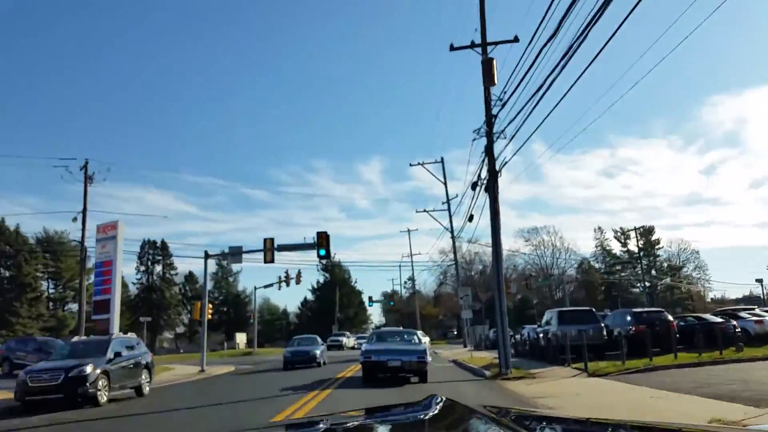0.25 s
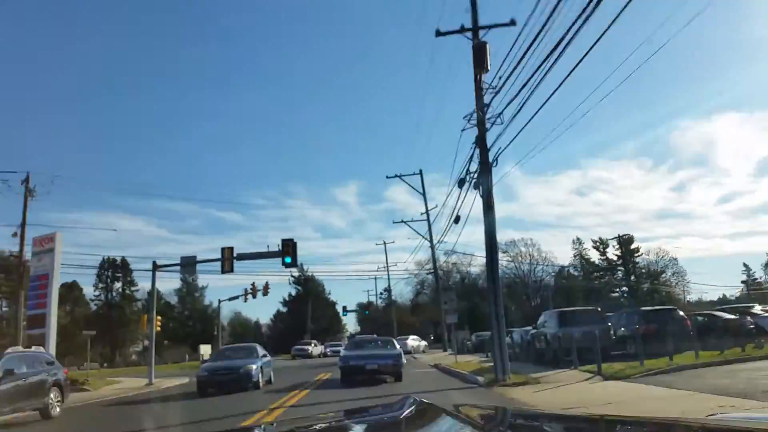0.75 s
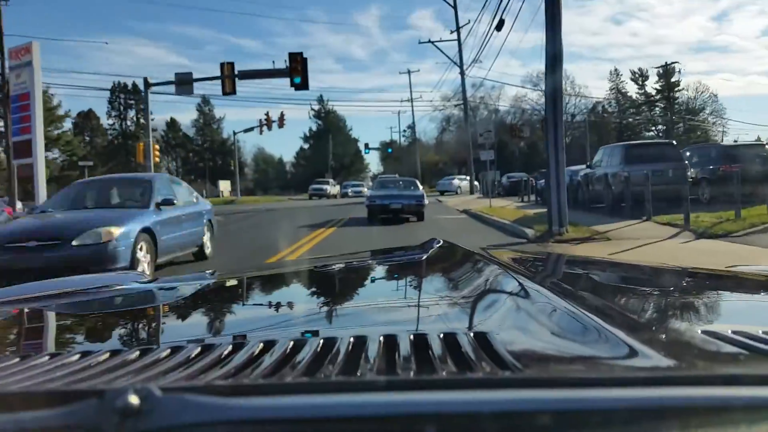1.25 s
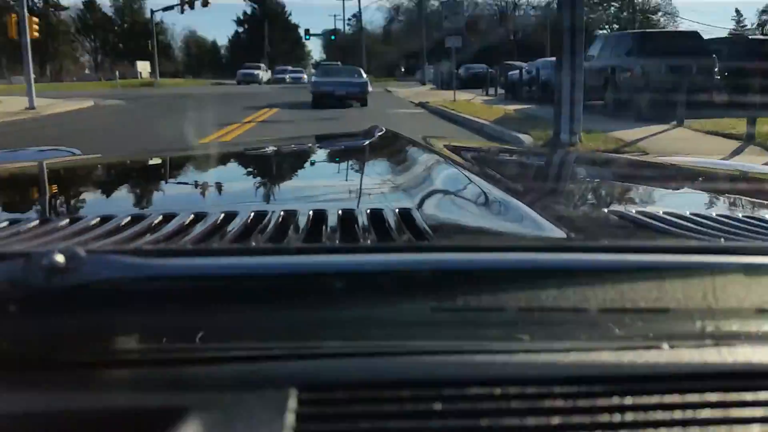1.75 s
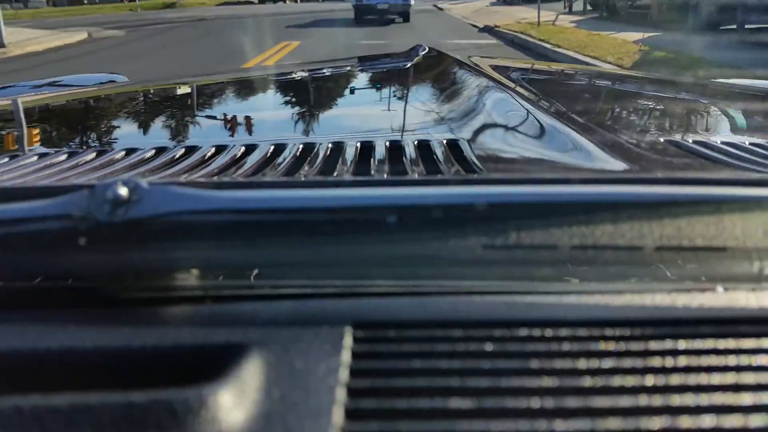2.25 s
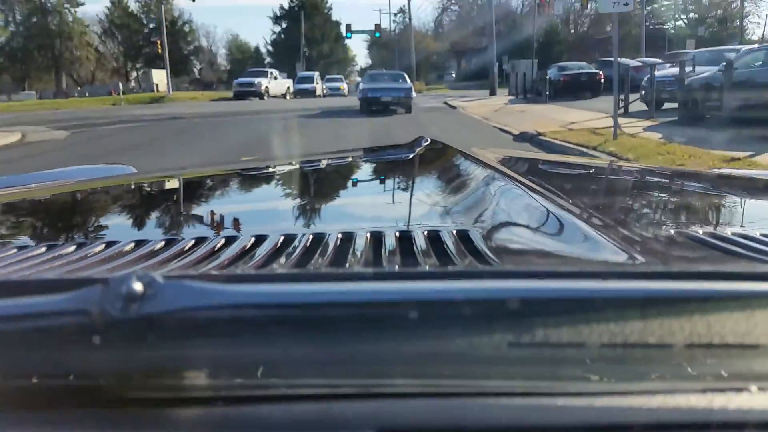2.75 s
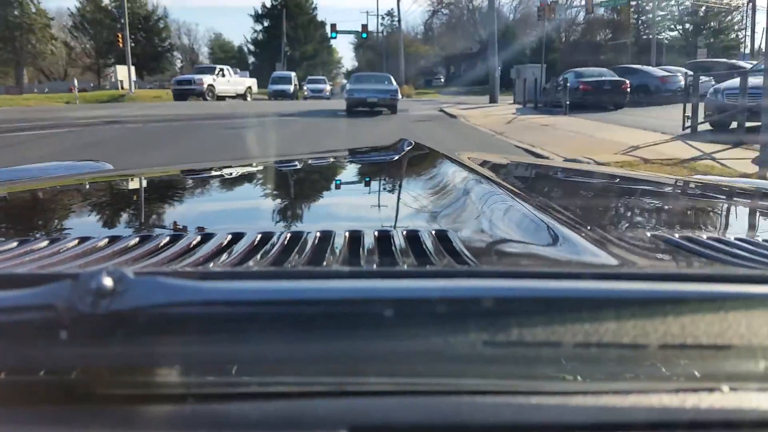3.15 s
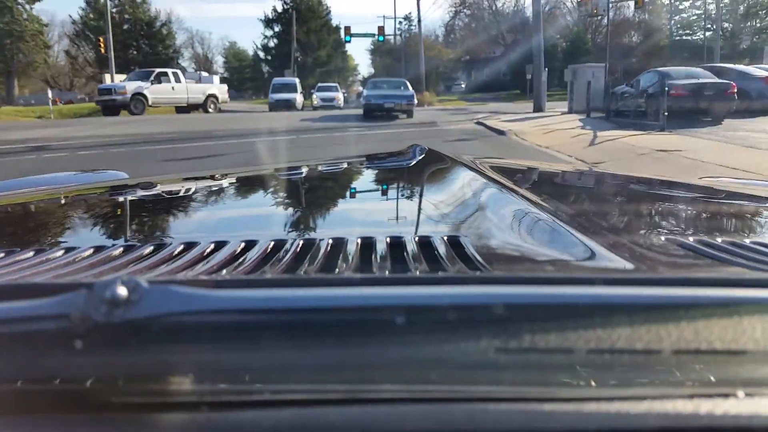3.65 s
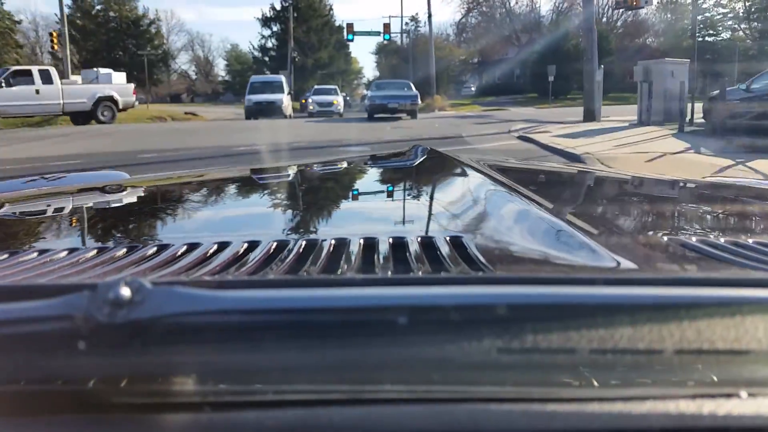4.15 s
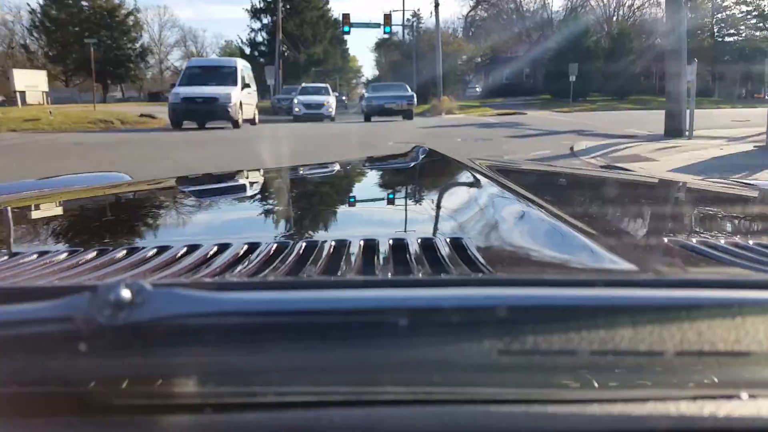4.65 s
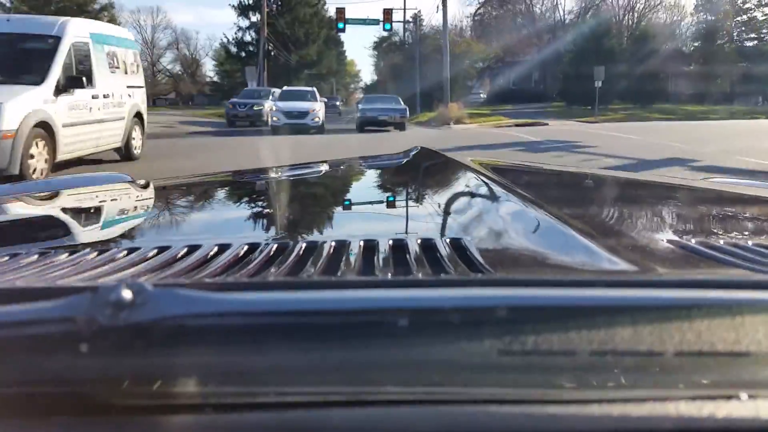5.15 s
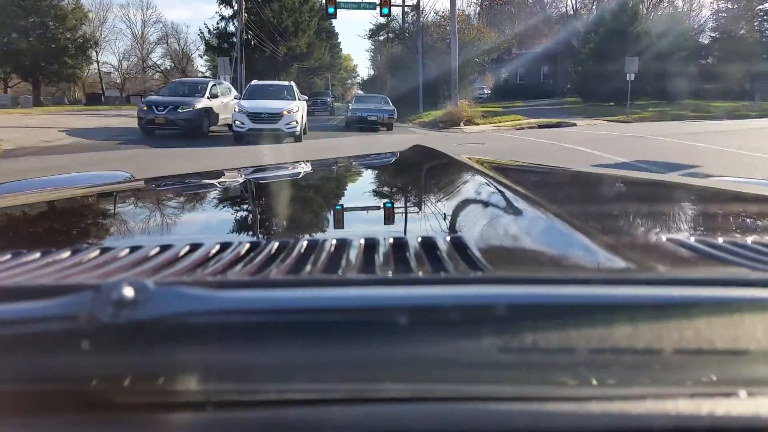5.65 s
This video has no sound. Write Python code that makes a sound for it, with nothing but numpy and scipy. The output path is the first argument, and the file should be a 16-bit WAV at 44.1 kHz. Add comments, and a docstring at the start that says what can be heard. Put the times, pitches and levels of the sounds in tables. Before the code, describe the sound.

Inside a V8 car on the road, heard through a hand-held stereo phone. A deep exhaust drone near 125 Hz holds almost steady from 0 to 4.3 s, slightly lumpy, over muffled cabin rumble. From 0 to 0.4 s fingers rub grittily; hard knocks at about 0.2, 0.65 and 1.13 s, mostly left, come amid a cluster of smaller taps and ticks, and the drone briefly ducks around several of them. Handling thins after 1.5 s: a bump near 2.0, short scrapes around 2.7 to 2.85, thuds near 2.9 and 3.15, a clicky knock at 3.7. Soft high air hiss swells near 1.9, 2.9 and 3.7. At 4.3 s the throttle lifts; pitch falls quickly to about 86 Hz by 4.9, then eases to 68 at the end, the tone weakening into boomy coasting burble. Road rumble grows, with a bump at 5.3 and a strong airy rush from 5.5.

```python
"""Inside a V8 car, heard through the two ports of a hand-held phone.
At first the exhaust drones steadily as summed sines over rumbling band noise, air hisses as filtered
noise, and fingers rub (dense noise grains) and knock the phone (decaying sines and noise bursts), while
the firing tone dips briefly, mostly near knocks. Later the driver lifts off and the revs sink through
the cabin's resonances. A look-ahead limiter holds the peaks throughout."""
import sys
import numpy as np
from scipy import signal
from scipy.io import wavfile
from scipy.ndimage import uniform_filter1d, minimum_filter1d

SR = 44100
rng = np.random.default_rng(int(sys.argv[2]) if len(sys.argv) > 2 else 0)


def to_wav(s):
    """Save 16-bit WAV."""
    ch = np.atleast_2d(s).T  # columns
    pcm = np.round(np.clip(ch, -1, 1) * 32767)  # PCM
    wavfile.write(sys.argv[1], SR, pcm.astype(np.int16))


N = 260631  # length in samples

# Firing rate. Each row: time in seconds, rate in Hz.
FIRING_RATE = [(0, 123.7), (1.5, 125.2), (2.3, 125.8), (3.5, 125.5), (4.1, 126.8), (4.3, 126.4),
               (4.52, 113), (4.6, 101), (4.72, 92.4), (4.9, 86), (5.3, 76.5), (5.5, 72.7), (5.7, 69.8),
               (5.91, 68)]
# Cabin's response to the firing tone and its octave. Each row: frequency in Hz, level in dB.
DRONE_PATH = [(68, -16), (74.5, -15), (83.5, -18), (94, -23), (105, -30), (111.5, -12), (116, -9),
              (125, -11), (136, -10.5), (139.5, -8.5), (142, -14), (145.5, -18), (153, -22), (163, -29),
              (172, -35), (210, -42), (245, -34)]
# Slow swell of the firing tone. Each row: time in seconds, level change in dB.
DRONE_SWELL = [(0, 2.5), (.14, 3.5), (.25, 0.5), (.8, -4), (1.05, -1.4), (2, -1), (2.3, 1), (3.1, 3),
               (3.7, -.5), (4.3, 1)]
# Uneven firing over the two-turn cycle. Each row: multiple of the firing rate, level in dB re cabin level.
CYCLE_ORDERS = [(.25, 6), (.5, 8), (.75, 9), (.875, 5), (1.125, 7), (1.25, 13), (1.5, 2), (1.75, 6),
                (2.25, 1), (2.5, 0), (2.75, 4), (2.875, 3.5), (3.125, -1), (3.25, 0), (3.5, -2),
                (3.75, 6.5)]
# Cabin noise. Each row: time in seconds, cabin level in dB, treble tilt in dB per two octaves,
# level of the road rumble under the floor in dB.
CABIN_LEVELS = [(0, -40.5, 4, -44), (.5, -45, -0.5, -39), (1, -47, -5.5, -40.5), (2, -45, 8, -36),
                (2.5, -45, 4.5, -35), (3.06, -42, 4, -34), (3.6, -44.5, 4, -33), (4.2, -44, 1, -32),
                (4.6, -42.5, -4, -26.5), (5.3, -40, 3.5, -23.5), (5.6, -34.5, 5, -17.5),
                (5.91, -35, 5.5, -16)]
# Relative spectral density of the cabin noise. Each row: frequency in Hz, density in dB per Hz.
CABIN_COLOUR = [(60, -12), (100, 6.5), (200, -4), (350, -17), (500, -13.5), (720, -17), (950, -29),
                (1500, -38.5), (2400, -44), (3300, -55), (5000, -64), (7000, -92.5)]
# Stereo width of the cabin noise. Each row: frequency in Hz, side minus mid in dB.
CABIN_SIDE = [(60, -10), (150, -16), (250, -2.5), (500, -8), (1000, 7.5), (2000, -0.5), (6000, 1)]
# Cabin modes. Each row: frequency in Hz, width in Hz, level in dB re cabin level before the boom change.
CABIN_MODES = [(112, 16, 9), (216, 14, 4), (345, 22, -7), (455, 20, -10)]
# Finger slides. Each row: start, strongest moment and end in seconds, left and right port level in dB.
FINGER_SLIDES = [(-.15, -0.013, 0.152, -25.5, -45.5), (0.173, 0.284, 0.43, -31.5, -37),
                 (0.466, 0.482, .51, -33, -43), (0.519, 0.527, 0.58, -32.5, -54.5),
                 (0.636, .66, 0.66, -50.5, -52.5), (0.804, .82, 0.83, -44, -41.5),
                 (0.844, 0.868, 0.85, -44.5, -39), (1.046, 1.072, 1.07, -48, -40.5),
                 (1.144, 1.168, 1.165, -45.5, -48), (1.416, 1.506, 1.53, -51, -39),
                 (1.55, 1.583, 1.585, -54, -43.5), (1.673, 1.724, 2.02, -43.5, -42.5),
                 (2.638, 2.724, 2.75, -38.5, -51.5), (2.74, 2.81, 2.855, -33, -49.5)]
# Air in the ports. Each row: time in seconds, port hiss in dB, broad rush in dB.
AIR_LEVELS = [(0, -59, -66), (.3, -59, -76), (.66, -75.5, -86), (1, -68.5, -80.5), (1.4, -74, -88),
              (1.6, -65.5, -86), (1.87, -51, -77.5), (2.09, -62.5, -84.5), (2.55, -71, -86.5),
              (2.88, -53.5, -67), (3.18, -60.5, -69.5), (3.5, -66, -70.5), (3.68, -57.5, -67),
              (3.98, -66.5, -78.5), (4.77, -76.5, -97), (5.42, -59, -66), (5.58, -48.5, -62),
              (5.62, -43.5, -50.5), (5.76, -45, -48.5), (5.91, -52, -53.5)]
# Short dips of the firing tone. Each row: deepest moment in seconds, level change in dB.
DRONE_DIPS = [(.175, -8), (0.194, -15.5), (.45, -2.5), (.648, -12.5), (0.784, -16), (.84, -5), (1.149, -5),
              (1.225, -4.5), (3.14, -7.5), (3.7, -2)]
# Knocks. Each row: start in seconds, overall level in dB, left minus right in dB, then thump, crack
# and port tick, each in dB re the overall level.
KNOCKS = [(.187, -13, 21, -0.5, -5, -28), (.202, -10, 32, 13, 0, -23), (.348, -26.5, 9.5, 3.5, -15, -30),
          (.441, -19, -17, 7.5, -10.5, -22.5), (0.456, -34, 7, -3.5, 5, -26.5),
          (0.581, -25.5, -23, 12, -7.5, -22), (0.595, -31.5, -2, 4, -4, -25),
          (.633, -16.5, 18, -1.5, -19, -35), (.65, -7, 14.5, 8.5, 3.5, -21),
          (.746, -33.5, 25.5, 23.5, -14, -40), (0.782, -30.5, 21, 17.5, 1, -31),
          (.808, -29.5, 14, 9, 2, -30), (.816, -19, 26, 11, -5.5, -19), (.835, -25, 29, 17, -12, -22),
          (0.852, -31, -8, 3, -7, -9.5), (.916, -37, -9, -2, -17, -15.5), (1.022, -35.5, 15, -2, -9, -22),
          (1.046, -25.5, 11, 5, 0, -8), (1.066, -30, 12, -5, -4, -1), (1.073, -39.5, 8, 12, -5, -8),
          (1.093, -38, 10, 10.5, 1, -16), (1.129, -10, 15, -14, -20, -26),
          (1.138, -23.5, 21.5, 9.5, -23, -40), (1.202, -38, 16, 4, 0, -30), (1.229, -17, 26.5, 4, -12, -33),
          (1.444, -44.5, 1, -1, -0.5, 8.5), (1.466, -23, -21, 3.5, -27, -19),
          (1.49, -18, -13, 0.5, -15.5, -26), (1.559, -23, -15, -15, -30, -28),
          (1.965, -16.5, 13, 3.5, -17, -21), (2.302, -41, 8, -0.5, 6, -12), (2.313, -28, 20, -6, 3, -5),
          (2.378, -44, 11, 0, 9, -4), (2.429, -28.5, -24, 9.5, 0.5, -11), (2.522, -45, 10, -3, 9.5, -16),
          (2.6, -27, -5, -4, -24.5, -38), (2.631, -30, 11.5, 6, -4, -5.5),
          (2.872, -21, 11.5, 13, -12.5, -23), (3.103, -45.5, 5, -0.5, 6.5, -10.5),
          (3.143, -18, 20, 13.5, -10, -40), (3.535, -33, -5.5, 10, -13.5, -30.5),
          (3.593, -44, 7, -2, 11, -12), (3.679, -23.5, 34, -5, -1.5, -2), (3.685, -25, 20, 9, -7, -14),
          (3.691, -13.5, 8.5, -13, -19.5, -8), (3.704, -26.5, -9.5, -4, -0.5, 6.5),
          (3.939, -32, 7.5, 13, -21, -24), (4.134, -26, 15.5, 3, -32, -31.5),
          (4.255, -30, 7.5, -4.5, -24, -22), (4.54, -32, 22.5, 8.5, -28, -50),
          (4.687, -37, 9, 20, -40.5, -60), (4.786, -38.5, -5, 15.5, -33, -32),
          (5.301, -17, 19, -8, -44, -58), (5.495, -27, 3, 4, -30, -10)]

PORT_LAG_S = 0.00022  # the drone reaches the left port first
DIP_FALL_S, DIP_RISE_S = 0.028, 0.035
LIFT_S, LIFT_TAKES_S = 4.3, 0.28  # foot off the throttle
COAST_UNEVEN_DB = -7  # cycle orders weaken off throttle
CRUISE_BOOM_DB, COAST_BOOM_DB = -2.5, 9
BOOM_FADES_S, BOOM_FADE_DB_PER_S = 4.93, -7.5
BODY_HZ, BODY_SPREAD = 604, 0.16  # where a finger lands shifts the body ring by up to this share
HISS_PAN_DB = -3.5  # left minus right
TOP_HZ = 15900  # upper limit of the pickup


def undb(db):
    """Amplitude ratio: twenty decibels make a factor of ten."""
    return np.exp(np.asarray(db) * (np.log(10) / 20))


def curves(table):
    """Linear interpolation in time turns each column into a sample-rate curve."""
    seconds, *columns = np.transpose(table)
    return [np.interp(np.arange(N) / SR, seconds, column) for column in columns]


def at(table, hz):
    """A spectrum is interpolated over log frequency, as pitch is heard."""
    table_hz, values = np.transpose(table)
    return np.interp(np.log(hz), np.log(np.maximum(table_hz, 1)), values)


def unit(x):
    """Normalisation to an RMS of one over all channels."""
    return x / np.sqrt(np.mean(x ** 2))


def band(x, hz, width, order=3):
    """Butterworth band-pass with its edges in geometric symmetry about hz."""
    half = width / hz / 2
    edges = hz * (np.sqrt(1 + half ** 2) + np.array([-1, 1]) * half)
    edges = np.minimum(edges, .48 * SR)
    return signal.sosfilt(signal.butter(order, edges, "band", fs=SR, output="sos"), x)


def walk(rate):
    """Slow fluctuation: random levels held 1 / rate s and slewed twice, with a spread near 1."""
    hold = int(SR / rate)
    steps = np.repeat(rng.standard_normal(N // hold + 1), hold)
    return 1.19 * uniform_filter1d(uniform_filter1d(steps, hold), hold)[:N]


def pan(db):
    """Level difference between the ports: left and right gains whose mean stays at 1."""
    left = undb(db)
    return 2 * np.array([left, np.ones_like(left)]) / (1 + left)


def mid_side(mid, side):
    """Sum and difference: the side signal enters the two ports in opposite phase."""
    return mid + side * np.array([[1], [-1]])


def engine(cabin_db):
    """Periodic combustion: firing tone, octave and cycle orders, each wavering; also returns firing phase."""
    (hz,), (swell_db,) = curves(FIRING_RATE), curves(DRONE_SWELL)
    turn = 2 * np.pi * np.cumsum(hz) / SR
    firing_db = at(DRONE_PATH, hz) + swell_db + drone_dips() + 0.067 * walk(40)
    out = undb(firing_db) * np.sin(turn + 0.054 * walk(37))
    octave_db = at(DRONE_PATH, 2 * hz) + 1.5 * walk(20)
    out += undb(octave_db) * np.sin(2 * turn + 0.6 * walk(15))
    uneven_db = cabin_db + COAST_UNEVEN_DB * coasting_share()
    for multiple, db in CYCLE_ORDERS:
        waver_db, slip = 1.4 * walk(10), .25 * walk(10)
        phase = multiple * turn + 2 * np.pi * rng.random() + slip
        out += undb(uneven_db + db + waver_db) * np.sin(phase)
    return np.sqrt(2) * out, turn  # a sine's RMS is its peak over root two


def cabin(cabin_db, bright_db, rumble_db, turn):
    """Modal resonance under broadband noise: flickering bands pulse with the firings over road rumble."""
    out, swell = 0, walk(18)
    puff = 1 + 0.19 * np.cos(turn) + 0.16 * np.cos(turn / 4)
    for hz in 60 * 2 ** (np.arange(22) / 3):  # third-octave steps
        mid, side = unit(band(rng.standard_normal((2, N)), hz, hz / 4))
        # density times bandwidth gives band level; the tilt acts above 700 Hz
        db = at(CABIN_COLOUR, hz) + 10 * np.log10(hz) - 15.0
        db = db + bright_db * max(np.log2(hz / 700), 0) / 2
        flicker_db = 0.81 * swell + 0.49 * walk(7.9)
        out = out + undb(db + flicker_db) * mid_side(mid, undb(at(CABIN_SIDE, hz)) * side)
    out = puff * out
    fade_db = BOOM_FADE_DB_PER_S * np.clip(np.arange(N) / SR - BOOM_FADES_S, 0, .6)
    boom_db = CRUISE_BOOM_DB + (COAST_BOOM_DB - CRUISE_BOOM_DB) * coasting_share() + fade_db
    for hz, width, db in CABIN_MODES:
        mid, side = unit(band(rng.standard_normal((2, N)), hz, width, order=2))
        out = out + undb(db + boom_db) * mid_side(mid, undb(at(CABIN_SIDE, hz)) * side)
    mid, side = unit(band(rng.standard_normal((2, N)), 44, 34))
    return undb(cabin_db) * out + undb(rumble_db) * mid_side(mid, 0.24 * side)


def finger_rubs():
    """Stick-slip friction in dense grains; the half-covered left port rings near 3 kHz, the right is duller."""
    t, slide = np.arange(N) / SR, np.zeros((2, N))
    for start, top, end, *db in FINGER_SLIDES:
        # the finger stops short
        shape = np.interp(t, (start, top, end, end + 0.018), (0.0086, 0.96, 0.27, 0.0014))
        slide += undb(db)[:, None] * shape
    grain_db = 2.0 * rng.exponential(size=(2, N)) + 2.0 * walk(90)
    grains = rng.standard_normal((2, N)) * undb(grain_db)
    ring = unit(band(grains, 3335, 610, order=2)) * np.array([[.95], [.1]])
    body = unit(band(grains, 1500, 1300)) * np.array([[.6], [.9]])
    body += 0.1 * unit(band(grains, 3520, 2200, order=4))
    body += 0.8 * unit(band(grains, 600, 280, order=2))  # the shell drags along
    return slide * (ring + body)


def air():
    """Turbulent flow excites each port near its own resonance; a broader rush comes with stronger draught."""
    hiss_db, rush_db = curves(AIR_LEVELS)
    gust_db = 2.8 * walk(55) + 1.4 * np.array([walk(7.5), walk(8.6)])
    flow = rng.standard_normal((2, N)) * undb(gust_db)
    hiss = unit(band(flow, 10600, 2000)) + 0.5 * unit(band(flow, 13800, 4000))
    rush = unit(band(flow, 3500, 4500))
    return hiss * undb(hiss_db) * pan(np.array([HISS_PAN_DB])) + undb(rush_db) * rush


def drone_dips():
    """Amplitude modulation in dB: the firing tone sinks and returns about each listed moment."""
    t = np.arange(N) / SR
    dips = [np.interp(t, (s - DIP_FALL_S, s, s + DIP_RISE_S), (0, db, 0)) for s, db in DRONE_DIPS]
    return np.min(dips, axis=0)


def decay(t, t60):
    """Exponential damping: the amplitude falls by 60 dB in t60 seconds."""
    return np.exp(-np.log(1000) * t / t60)


def knocks():
    """Impact excitation: a thump, short body ring, ragged crack and high tick, at each port's own level."""
    length = 4096  # samples per knock
    out, t = np.zeros((2, N + length)), np.arange(length) / SR

    def ring(hz, t60):
        """Free vibration: a damped sine."""
        return decay(t, t60) * np.sin(2 * np.pi * hz * t)

    chance = rng.standard_normal((len(KNOCKS), 2, length))
    for (s, db, pan_db, thump_db, crack_db, tick_db), noise in zip(KNOCKS, chance):
        hz = BODY_HZ * (1 + BODY_SPREAD * np.tanh(noise[0, -1]))
        burst = noise * decay(t, 0.019)
        # flesh on plastic: the body starts without a sharp edge
        body = ring(hz, 0.01) + .5 * ring(1.99 * hz, 0.0034) + band(burst, hz, 830, order=2)
        body = band(body, 750, 2400)
        crack = undb(crack_db) * band(burst + 1.5 * ring(3180, 0.0011), 2200, 2800)
        thump = 1.26 * ring(180, 0.043) + 0.5 * ring(250, 0.029) + 0.5 * band(burst, 300, 490, order=2)
        thump = undb(thump_db) * band(thump, 210, 600, order=2)
        tick = undb(tick_db) * band(burst, 11320, 4400)
        knock = (thump + crack - 1.9 * body) * pan(np.array([pan_db]))
        knock = knock + tick * pan(np.array([pan_db / 4 - 8.0]))
        i = int(s * SR)
        out[:, i:i + length] += undb(db) * knock
    return out[:, :N]


def coasting_share():
    """Engine load: share of the way from cruising (0) to coasting (1)."""
    return np.clip((np.arange(N) / SR - LIFT_S) / LIFT_TAKES_S, 0, 1)


def scene():
    """Superposition of all sources, with the drone's travel time between the ports."""
    cabin_db, bright_db, rumble_db = curves(CABIN_LEVELS)
    drone, turn = engine(cabin_db)
    late = np.interp(np.arange(N) - PORT_LAG_S * SR, np.arange(N), drone)
    out = np.array([drone, late]) * pan(np.array([1.2]))
    out = out + cabin(cabin_db, bright_db, rumble_db, turn)
    return out + finger_rubs() + air() + knocks()


def record(dry):
    """Band-limited pickup: capsules lose deep bass, a shared look-ahead limiter acts, then the top is cut."""
    dry = signal.sosfilt(signal.butter(2, 36, "high", fs=SR, output="sos"), dry)
    need = np.minimum(1, 0.93 / (np.abs(dry).max(axis=0) + 1e-9))
    ahead = int(0.008 * SR)  # window spans both sides of a peak
    gain = uniform_filter1d(minimum_filter1d(need, size=ahead), size=ahead)
    return signal.sosfilt(signal.ellip(8, .2, 70, TOP_HZ, fs=SR, output="sos"), gain * dry)


dry = scene()
out = record(dry)
to_wav(out)
```